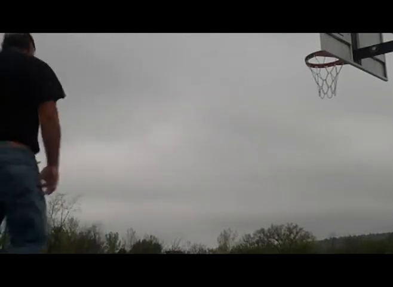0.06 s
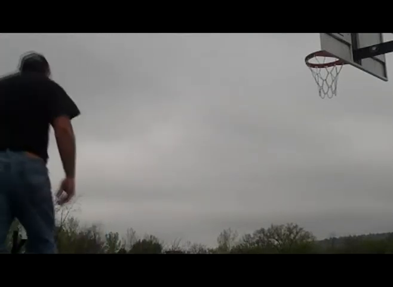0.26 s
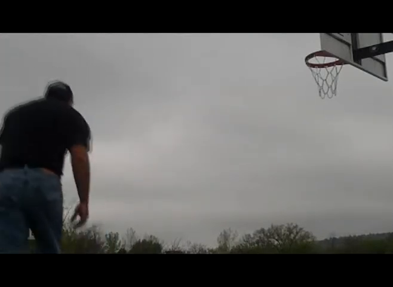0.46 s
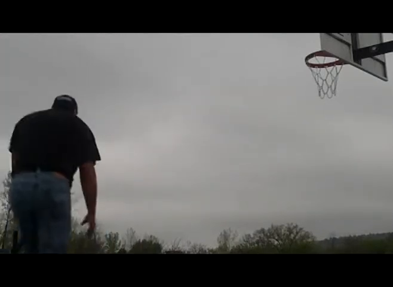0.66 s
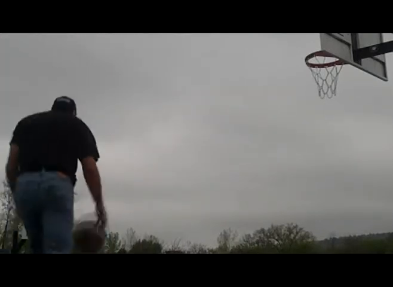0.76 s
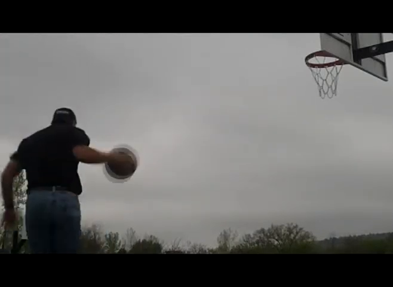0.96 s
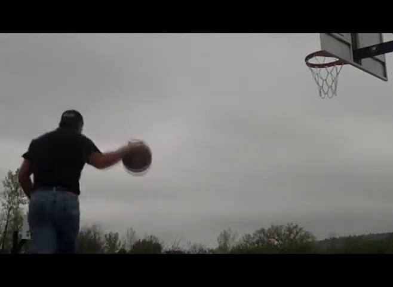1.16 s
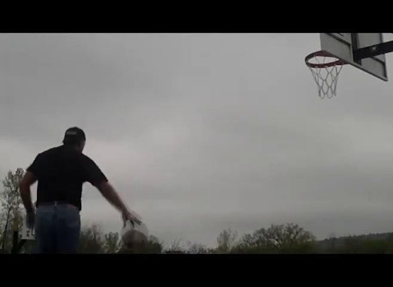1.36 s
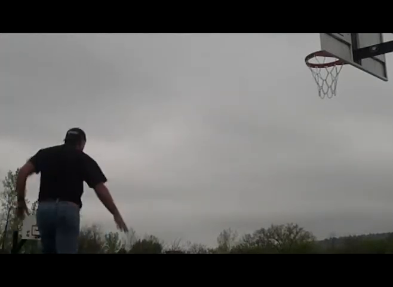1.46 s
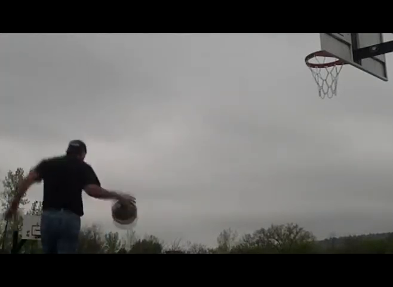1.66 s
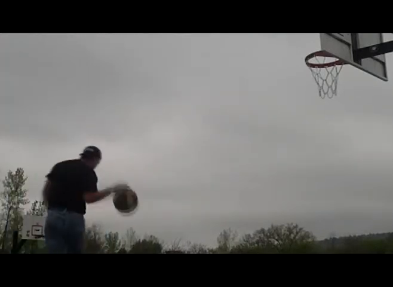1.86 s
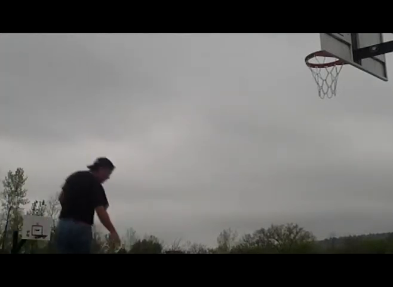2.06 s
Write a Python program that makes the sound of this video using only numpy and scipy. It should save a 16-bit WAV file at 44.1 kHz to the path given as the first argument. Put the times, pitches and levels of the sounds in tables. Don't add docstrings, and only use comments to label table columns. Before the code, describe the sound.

A basketball slaps a hard outdoor court three times, with gritty shoe scuffs and faint traffic hiss between.

```python
import sys
import numpy as np
from scipy import signal
from scipy.io import wavfile

SR = 44100
rng = np.random.default_rng(int(sys.argv[2]) if len(sys.argv) > 2 else 0)


def makeup_ratio(level_db):
    decades = np.asarray(level_db, float) / 20
    return 10 ** decades


def transcribe(signal):
    frames = np.atleast_2d(signal).T
    limited = np.clip(frames, -1, 1)
    pcm = np.round(limited * 32767).astype(np.int16)
    wavfile.write(sys.argv[1], SR, pcm)


N = 92610

# (frequency [Hz], density [dB per Hz])
AIR_SPECTRUM = [(40, -15), (195, -12.5), (376, -4), (913, 1), (1870, -12), (3300, -18.5), (4300, -28.5),
                (11500, -35.5)]
# (time [s], level [dB])
AIR_LEVEL = [(0, -38.5), (0.501, -41.5), (.9, -42.5), (1.5, -43), (2.1, -43.5)]
# (time [s], length [s], start [Hz], end [Hz], level [dB])
WHISTLES = [(0.907, 0.044, 2790, 2760, -56), (1.125, .03, 4120, 3890, -60), (1.128, .03, 3750, 3710, -55),
            (1.162, 0.029, 3520, 3400, -57), (1.203, 0.029, 2950, 2800, -52.5),
            (1.332, .022, 3320, 3240, -59), (1.375, 0.033, 2400, 2400, -56), (1.411, .035, 2360, 2335, -56),
            (1.38, .095, 5100, 6100, -70), (1.376, .095, 5100, 6160, -70),
            (1.676, 0.018, 2660, 2640, -46.5), (1.929, 0.081, 2830, 2766, -51),
            (1.998, 0.026, 2625, 2550, -50.5)]
# (time [s], length [s], level [dB], throb rate [1/s])
BUZZES = [
    (1.702, 0.18, -60.5, 110),
    (2.034, .09, -53.5, 129),
]
# (time [s], length [s], level [dB], low weight [dB], high weight [dB])
SCUFFS = [(0.001, 0.012, -34, -23, -15), (0.133, 0.0067, -42, -12, -3), (0.191, 0.015, -31.5, -8, -0.5),
          (0.2, 0.025, -33, -5, -35), (0.25, 0.012, -40, -8, -16), (0.287, 0.025, -44, 6.5, -15),
          (0.323, 0.019, -40, 9.5, -0.5), (0.34, 0.0055, -27, 0.5, -24), (0.345, 0.019, -35.5, -5.5, -0.5),
          (0.365, 0.019, -37.5, 5, 1), (0.387, 0.0093, -24, -1.5, -13), (0.395, 0.045, -37, 2, 0),
          (0.449, 0.038, -53.5, 9, 9), (0.495, 0.018, -35, -2, -3), (.515, 0.0077, -36.5, -1, 3),
          (0.805, 0.0082, -47.5, -21, 11), (0.87, 0.018, -49, 0, -6), (0.901, 0.0069, -42, -29, 13.5),
          (1.134, 0.0097, -50.5, 14.5, -26), (1.194, 0.021, -54, 9, 8.5), (1.267, 0.021, -47.5, -10, -4),
          (1.648, 0.017, -44, 3, 4), (1.667, 0.013, -51, -4, 12), (1.917, 0.02, -49, 5, 4),
          (2.031, .035, -48.5, 1.5, -1)]
# (time [s], peak [dB], ring [Hz])
SNAPS = [(0.1968, -18, 3250), (0.2552, -24, 560), (.3415, -17.5, 1040), (0.39, -17.5, 926),
         (0.4855, -18, 2970), (.4995, -19, 3200), (0.515, -27.5, 3300), (0.431, -19, 2550),
         (.44, -31.5, 2630), (.606, -32, 870), (0.9021, -50, 4860), (1.696, -34, 1300), (1.72, -29.5, 2800),
         (1.787, -38, 2700), (2.053, -32, 1400)]
# (time [s], level [dB], wall echo [dB], near echo [dB], yard tail [dB])
BOUNCES = [
    (.052, -2, -14.5, -5.5, -34),
    (.7395, -8, -9, -2.5, -32),
    (1.5585, -6.5, -13, -2, -34.5),
]
# (frequency [Hz], onset lag [ms], swell time [ms])
BALL_MODES = [(300, 1.0, 2.8), (490, 2.0, 2.6), (880, 1.0, 2.1), (1150, 2.4, 1.7), (1500, -.6, 1.8),
              (1800, -.2, 1.8), (2350, -.8, 1.7), (2820, -.6, 2.0), (3650, -1.0, 1.8), (5150, -.8, 1.5),
              (6250, -.6, 1.1), (7750, .6, 1.4), (10000, -.1, .7), (400, 8, 9)]
# (first bounce [dB], second bounce [dB], third bounce [dB])
MODE_STRIKES = [(-12.5, -10.5, -9), (-12, -15.5, -10), (-6, -1.5, -5.5), (-3.5, -1, -14.5),
                (-3.5, -8.5, -4), (-5.5, -9, -3.5), (-8, -10.5, -8), (-4, -4.5, -1), (-13.5, -19, -14),
                (-25, -33, -26), (-45, -29, -24), (-33, -43, -27.5), (-31.5, -40, -38), (-19, -24.5, -17)]
# (frequency [Hz], density [dB per Hz])
YARD_SPECTRUM = [(150, -32), (316, -3.5), (607, -12), (967, 5.5), (2700, -6.5), (3400, -11), (4300, -20),
                 (11500, -50)]


def rms_one(x):
    return x / np.sqrt(np.mean(x ** 2) + 1e-20)


def band(x, low_hz, high_hz):
    edges_hz = [low_hz, min(high_hz, SR * .45)]
    return signal.sosfilt(signal.butter(2, edges_hz, "band", fs=SR, output="sos"), x)


def drift(rate_hz):
    knots = rng.standard_normal(300)
    return np.interp(np.arange(N) / SR * rate_hz, np.arange(len(knots)), knots)


def coloured(spectrum, patchy_db):
    hz, db = np.transpose(spectrum)
    edges_hz = 30 * 2 ** np.arange(0, 9, 1 / 3)
    white = rng.standard_normal((2, N))
    together = drift(9)
    out = np.zeros(N)
    for k, (low, high) in enumerate(zip(edges_hz, edges_hz[1:])):
        centre = np.log(low * high) / 2
        level_db = np.interp(centre, np.log(hz), db, left=db[0] - 13, right=db[-1] - 20)
        flicker_db = patchy_db * (.5 * together + drift(25))
        out += makeup_ratio(level_db + flicker_db) * band(white[k % 2], low, high)
    return rms_one(out)


def window(start_s, length_s, edge_s):
    t = np.arange(N) / SR - start_s
    return np.clip(np.minimum(t, length_s - t) / edge_s + .5, 0, 1) ** 2


def swell(age_s, rise_s):
    return (age_s / rise_s * np.exp(1 - age_s / rise_s)) ** 3


def air():
    s, db = np.transpose(AIR_LEVEL)
    level_db = np.interp(np.arange(N) / SR, s, db)
    return makeup_ratio(level_db) * coloured(AIR_SPECTRUM, patchy_db=0.7)


def whistles():
    t, out = np.arange(N) / SR, np.zeros(N)
    for s, length_s, start_hz, end_hz, db in WHISTLES:
        hz = np.interp(t, [s, s + length_s], [start_hz, end_hz]) + 22 * drift(110)
        tone = np.sqrt(2) * np.sin(2 * np.pi * np.cumsum(hz) / SR)
        out += makeup_ratio(db + 1.5 * drift(60)) * window(s, length_s, 0.0059) * tone
    return out


def buzzes():
    rasp_hz, rasp_db, foot_hz, foot_lag_s = 5850, -4, 4980, .035
    t, out = np.arange(N) / SR, np.zeros(N)
    rasp = rms_one(band(rng.standard_normal(N), rasp_hz - 350, rasp_hz + 350))
    for s, length_s, db, rate_hz in BUZZES:
        throb = np.clip(np.sin(2 * np.pi * rate_hz * (t - s) + 2.2 * drift(50)), 0, 1)
        foot = 2 * throb * np.sin(2 * np.pi * foot_hz * t)
        foot = foot * window(s + foot_lag_s, length_s - foot_lag_s, .02)
        out += makeup_ratio(db) * (foot + makeup_ratio(rasp_db) * rasp * window(s, length_s, .015))
    return out


def scuffs():
    grains_per_s, spread_db = 1800, 5
    sizes = makeup_ratio(spread_db * np.minimum(rng.exponential(1, N), 3)) * rng.choice([-1, 1], N)
    grit = sizes * (rng.random(N) < grains_per_s / SR) + 0.089 * rng.standard_normal(N)
    low = rms_one(band(grit, 700, 1800))
    mid = rms_one(band(rms_one(band(grit, 2300, 3700)), 1800, 4200))
    high = makeup_ratio(-13) * rms_one(band(grit, 4000, 6600))
    high = high - makeup_ratio(-32) * rms_one(band(grit, 7000, 12000))
    out = np.zeros(N)
    for s, length_s, db, low_db, high_db in SCUFFS:
        mix = makeup_ratio(low_db) * low + mid + makeup_ratio(high_db) * high
        out += makeup_ratio(db) * window(s, length_s, 0.0092) * mix
    return out


def snaps():
    rise_cycles, overtone_ratio, overtone_db, tick_db = 1.6, 1.65, -8, -23
    out = np.zeros(N)
    tick = rms_one(band(rng.standard_normal(N), 3500, 8500))
    for s, db, hz in SNAPS:
        age = np.clip(np.arange(N) / SR - s, 0, .1)
        ring = np.sin(2 * np.pi * hz * age)
        ring = ring + makeup_ratio(overtone_db) * np.sin(2 * np.pi * overtone_ratio * hz * age)
        out += makeup_ratio(db) * swell(age, rise_cycles / hz) * (ring + makeup_ratio(tick_db) * hz / 3000 * tick)
    return out


def ball_hit(k, crack):
    crack_db, crack_s = -19.5, 0.0019
    s, db = BOUNCES[k][:2]
    t, hit = np.arange(N) / SR, np.zeros(N)
    for (hz, lag_ms, rise_ms), strikes_db in zip(BALL_MODES, MODE_STRIKES):
        age = np.clip(t - s - lag_ms / 1000, 0, .2)
        tone = np.sin(2 * np.pi * hz * age + rng.uniform(0, 2 * np.pi))
        hit += makeup_ratio(db + strikes_db[k]) * swell(age, rise_ms / 1000) * tone
    crack_age = np.clip(t - s + crack_s / 2, 0, .1)
    return hit + makeup_ratio(db + crack_db) * swell(crack_age, crack_s) * crack


def echo(hit, delay_s, db):
    return makeup_ratio(db) * np.roll(hit, int(delay_s * SR))


def ball():
    tail_lag_s, tail_rise_s, tail_t60_s = .022, .0015, .25
    t, out = np.arange(N) / SR, np.zeros(N)
    yard = coloured(YARD_SPECTRUM, patchy_db=1.0)
    crack = band(rng.standard_normal(N), 1800, 4470)
    crack = rms_one(crack + 0.18 * band(rng.standard_normal(N), 5600, 7300))
    for k, (s, _, wall_db, near_db, tail_db) in enumerate(BOUNCES):
        hit = ball_hit(k, crack)
        out += hit
        out += echo(band(band(hit, 397, 1500), 167, 1950), .0045, near_db)
        out += echo(band(hit, 540, 4200), .009, wall_db)
        out += echo(band(band(hit, 350, 1700), 450, 2600), .0125, -13)
        age = t - s - tail_lag_s
        decay_db = -60 * np.clip(age, 0, 1) / tail_t60_s
        out += yard * makeup_ratio(tail_db + decay_db) * np.clip(age / tail_rise_s, 0, 1)
    return out


def scene():
    mid = air() + whistles() + buzzes() + scuffs() + snaps() + ball()
    side = makeup_ratio(-29) * band(np.roll(mid, 30), 740, 5400)
    return np.array([mid + side, mid - side])


def band_limit(x):
    return signal.sosfilt(signal.butter(12, 12300, fs=SR, output="sos"), x)


def record(dry):
    top_cut_hz, overload, bass_cut_hz = 12000, 1.03, 100
    x = signal.sosfilt(signal.cheby2(18, 40, top_cut_hz, fs=SR, output="sos"), dry)
    x = np.clip(x, -overload, overload)
    x = signal.sosfilt(signal.butter(2, bass_cut_hz, "high", fs=SR, output="sos"), x)
    return band_limit(x)


dry = scene()
out = record(dry)
transcribe(out)
```